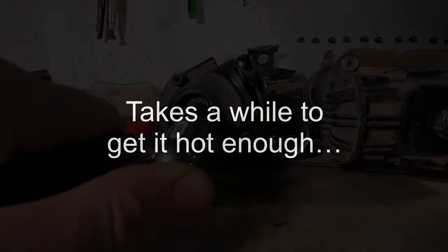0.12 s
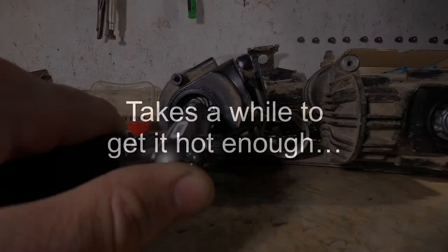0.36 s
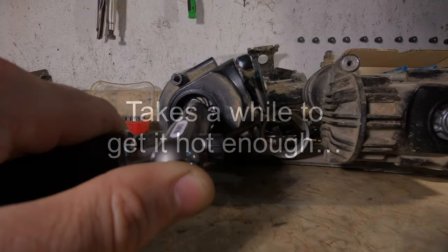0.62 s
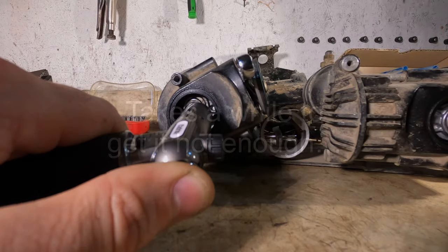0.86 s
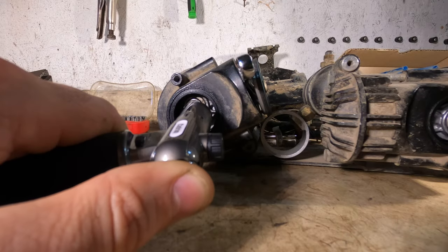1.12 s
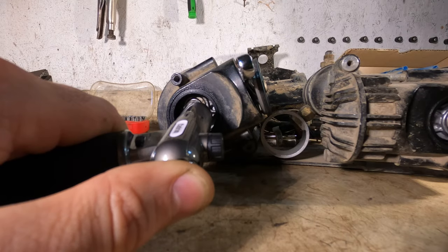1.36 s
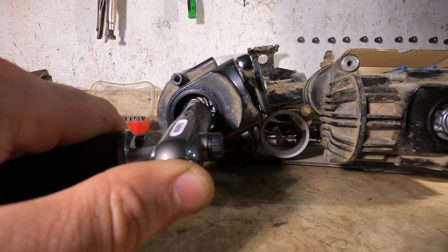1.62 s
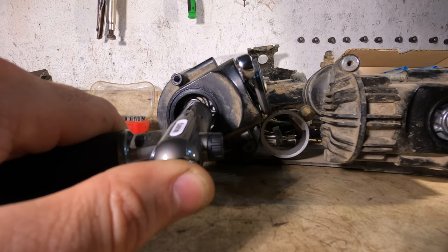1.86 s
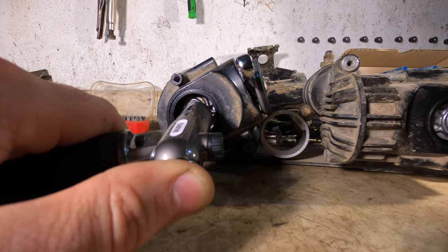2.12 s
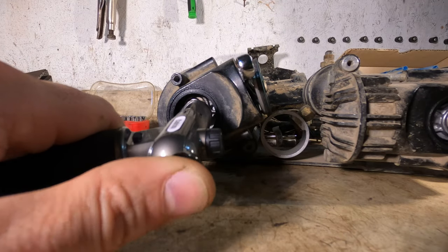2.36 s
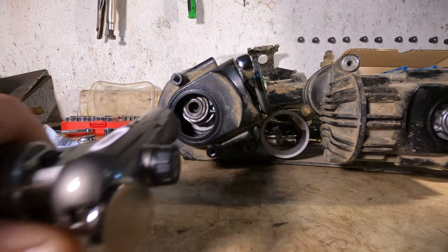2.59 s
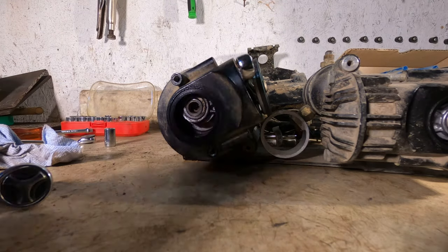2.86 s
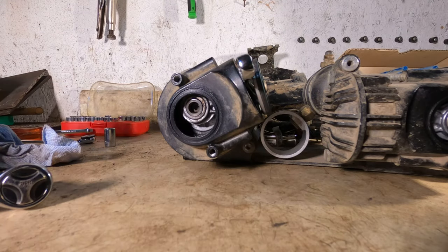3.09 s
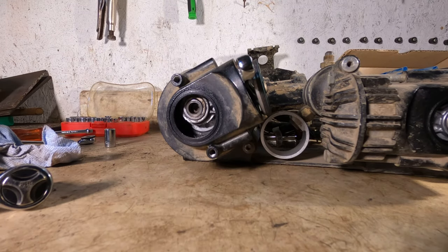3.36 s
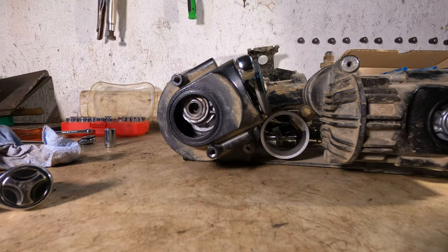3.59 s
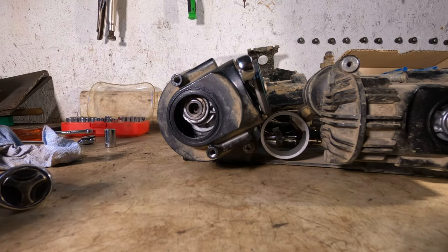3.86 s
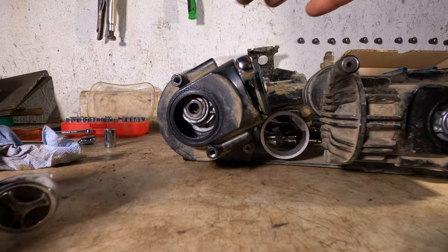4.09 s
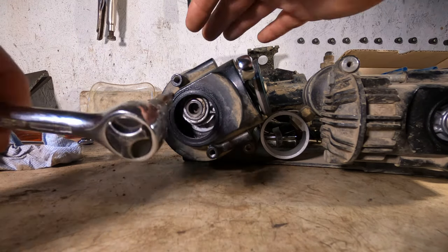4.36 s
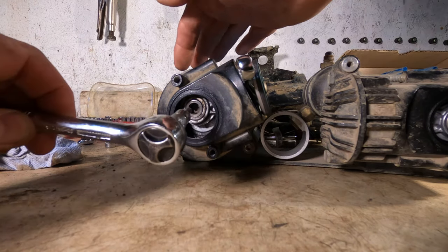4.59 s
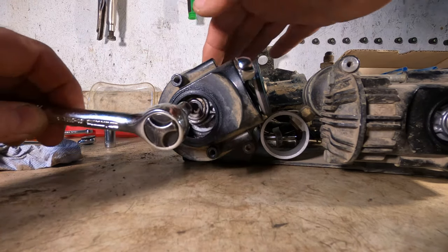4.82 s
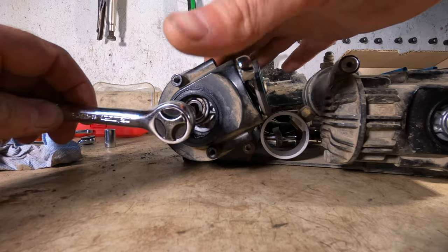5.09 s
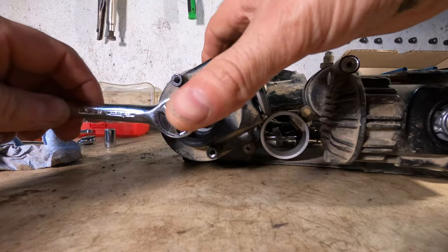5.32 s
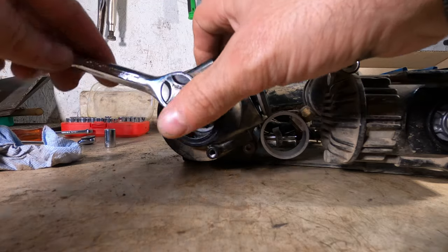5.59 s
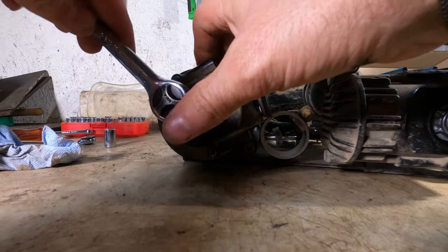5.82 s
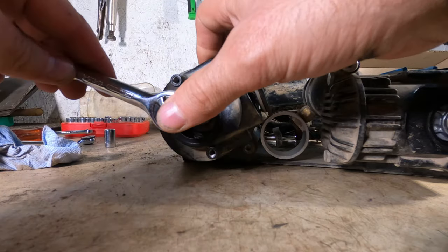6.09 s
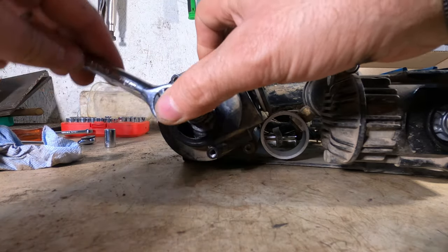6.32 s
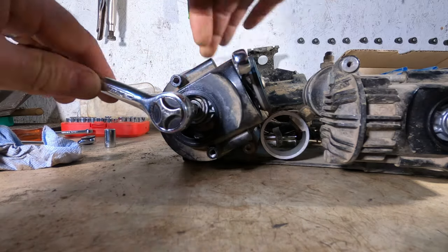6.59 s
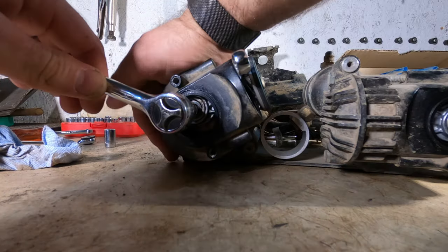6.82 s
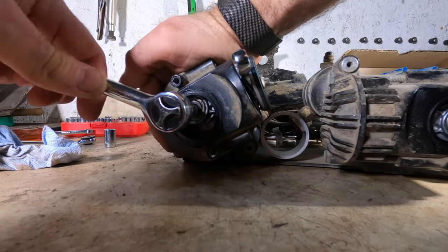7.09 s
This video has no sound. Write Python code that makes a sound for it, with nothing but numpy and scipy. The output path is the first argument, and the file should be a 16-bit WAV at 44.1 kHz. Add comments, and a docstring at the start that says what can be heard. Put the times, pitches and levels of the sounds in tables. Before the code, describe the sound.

Close stereo pickup in a small quiet workshop. From 0 to 2 s a small gas torch roars loudly and evenly inside a metal bore, a hollow midrange rush with a thin hiss of gas on top. At 2.0 s it is drawn out and breaks into fast irregular sputters, barking and spitting with low buffeting, until a loud sharp click shuts it off near 2.57 s. Brief rasps on wood follow to 2.7 s, then near silence with soft hiss. At 3.35-3.5 s the torch lands on the bench in a hard, woody, metallic clatter, leftward, with a fading scrape. From 3.95 s a ratchet drags across the wood, with a bright steel clink at 4.17 s. Faint fitting ticks and dull casing taps come at 5.05-5.6 s, over a low mutter; firmer knocks at 6.1-6.45 s, and a clinking scrape and knocks around 6.9-7.0 s.

```python
"""A small gas torch roars in the bore of a metal casing, sputters as it is drawn out and clicks off.
Then it is dragged over the wooden bench and set down hard; a ratchet is slid up, fitted and knocked on.
Flame and rasps are shaped noise; blows are noise cracks that ring modes of casing, bench and steel.
A close pair of microphone ports hears them in a small quiet workshop, over soft hiss and a low mutter."""
import sys
import numpy as np
from scipy import signal
from scipy.fft import rfft, irfft
from scipy.io import wavfile
from scipy.ndimage import uniform_filter1d

SR = 44100
rng = np.random.default_rng(int(sys.argv[2]) if len(sys.argv) > 2 else 0)


def wav_out(sig):
    """Save sig, one row per channel (or a flat mono array), as 16-bit PCM at SR to the path in sys.argv[1]."""
    wavfile.write(sys.argv[1], SR, np.round(np.clip(np.atleast_2d(sig).T, -1, 1) * 32767).astype(np.int16))


def volts_from_db(level):
    """Convert decibel levels to linear amplitude ratios."""
    exponent = np.asarray(level, float) / 20
    return 10 ** exponent


N = 317520
T = np.arange(N) / SR  # seconds
# the torch starts to leave the bore, takes this long to clear it, is shut off
DRAWN_S, DRAW_S, SHUT_S = 1.99, 0.096, 2.56


def unit(x):
    """Scale to rms 1."""
    return x / np.sqrt(np.mean(x ** 2))


def track(rows):
    """Columns of a curve, one value a sample."""
    s, *columns = np.transpose(rows)
    return [np.interp(T, s, c) for c in columns]


def ramp(start_s, length_s):
    """Rises from 0 at the start to 1 after the length."""
    return np.clip((T - start_s) / max(length_s, .001), 0, 1)


def walk(rate):
    """Slow smooth chance about 0, spread near a half, with rate fresh values a second."""
    k = int(SR / rate)
    steps = np.repeat(rng.standard_normal(N // k + 1), k)
    return 0.69 * uniform_filter1d(uniform_filter1d(steps, k), k)[:N]


def grains(spread_db):
    """Noise whose samples now and then stand out."""
    boost_db = spread_db * np.minimum(rng.exponential(size=N), 5)
    return unit(rng.standard_normal(N) * volts_from_db(boost_db))


def band(x, lo_hz, hi_hz, order=2):
    """Band-pass."""
    return signal.sosfilt(signal.butter(order, [lo_hz, min(hi_hz, .45 * SR)], "band", fs=SR, output="sos"), x)


def colour(x, points, peaks=()):
    """Minimum-phase filter through (Hz, dB) points, with resonances (Hz, width Hz, dB) added in power."""
    hz = np.maximum(np.arange(1025) * SR / 2048, 1)
    point_hz, point_db = np.array(points).T
    gain = volts_from_db(np.interp(np.log(hz), np.log(point_hz), point_db))
    power = sum(volts_from_db(db) ** 2 / (1 + (2 * (hz - f) / width) ** 2) ** 2 for f, width, db in peaks)
    gain = np.sqrt(gain ** 2 + power)
    # folding the cepstrum makes the filter causal
    cepstrum = irfft(np.log(gain + 1e-7))
    cepstrum[1:1024] *= 2
    cepstrum[1025:] = 0
    response = irfft(np.exp(rfft(cepstrum)))
    return signal.fftconvolve(x, response)[:len(x)]


def add(out, x, s):
    """Mix x into out from time s."""
    i = int(s * SR)
    out[i:i + len(x)] += x[:N - i]


def ring(modes, scatter_db, rise_ms):
    """One blow on a body: each mode is a close pair, struck differently each time; peak 1."""
    t, modes = T[:SR // 2], 2 * modes
    chance = rng.standard_normal((len(modes), 2))
    x = 0
    for (hz, db, t60), (strength, detune) in zip(modes, chance):
        mode_hz = hz + 0.6 * np.sqrt(hz) * detune
        x = x + volts_from_db(db + scatter_db * strength) * np.sin(2 * np.pi * mode_hz * t) * 1000 ** (-t / t60)
    x = x * (1 - np.exp(-t * 1000 / rise_ms))
    # loose parts chatter, so the ring fades unevenly
    chatter = np.interp(t, np.arange(61) / 120, rng.standard_normal(61))
    x = x * volts_from_db(2.5 * chatter * np.minimum(t / .03, 1))
    return x / np.abs(x).max()


def flame(db, drift_db_per_s):
    """Gain of a part of the flame: steady in the bore, drifting once drawn out, dying fast when shut."""
    drift_db = drift_db_per_s * np.clip(T - DRAWN_S, 0, SHUT_S - DRAWN_S)
    dying_db = 905 * np.maximum(T - SHUT_S, 0)
    return volts_from_db(db + drift_db - dying_db)


def torch():
    """Turbulent burning rings the bore; as the flame leaves it, it relights in short sharp puffs."""
    # colour of the burning: pitch_hz, relative level_db
    roar_colour = [(30, -87), (130, -20.5), (170, -17), (420, -9.5), (800, -7), (2700, -8), (3200, -21.5),
                   (4400, -33), (9500, -46), (12500, -71.5)]
    # resonances of the bore: pitch_hz, width_hz, relative level_db
    bore = [(974, 150, -1), (1340, 250, 0), (2290, 450, -2), (3600, 260, -17.5), (4700, 300, -31)]
    # the flame lifts and relights: start_s, relative strength_db
    sputters = [(2.0101, -8.5), (2.017, -13), (2.033, -8.5), (2.075, -8.5), (2.13, -9), (2.148, -8.5),
                (2.183, -11.5), (2.222, -11), (2.239, -5.5), (2.283, -8.5), (2.314, -7), (2.364, -9.5),
                (2.38, -19), (2.395, -17), (2.402, -9.5), (2.429, -10.5), (2.442, -10.5), (2.464, -6.5),
                (2.469, -7.5), (2.48, -8.5), (2.491, -4.5), (2.498, -12.5), (2.51, -9), (2.522, -9),
                (2.534, -7)]

    eddies = rng.standard_normal(N) * volts_from_db(1.8 * walk(160) + .5 * walk(10.7))
    puffs, t = np.zeros(N), T[:900] / 0.0035
    shape = np.sqrt(t) * np.exp(-t ** 1.75 / 1.98)
    for s, db in sputters:
        puff = shape * rng.standard_normal(len(t))
        # even out the chance strength of the middle band
        evened = puff * np.linalg.norm(shape) / np.linalg.norm(band(puff, 430, 3800))
        add(puffs, volts_from_db(db) * evened, s - .001)

    burning = flame(-26, -1.5) * eddies
    ringing = colour(burning + volts_from_db(-14.0) * puffs, roar_colour, bore)
    ringing = ringing / np.std(colour(eddies, roar_colour, bore))
    # part of each puff escapes the bore: a bark, a spit, a fizz above it and a thump
    bark = volts_from_db(-2.0) * band(puffs, 2044, 2620, order=4)
    spit = volts_from_db(-22.5) * band(puffs, 3970, 4920)
    fizz = volts_from_db(-37.5) * band(puffs, 2900, 8300)
    thump = volts_from_db(-9.5) * band(puffs, 94, 223, order=1)
    return ringing + bark + spit + fizz + thump


def nozzle():
    """Thin hiss of the gas jet, unlike at the two ports and stronger on the right."""
    # resonances of the jet: pitch_hz, width_hz, relative level_db
    jet = [(8690, 490, -3.5), (12160, 1100, 1), (10330, 11000, -12)]
    floor = [(1, -90), (2, -90)]  # next to nothing outside the resonances
    pair = [unit(colour(rng.standard_normal(N), floor, jet)) for _ in range(2)]
    return flame(-55, 5) * volts_from_db(np.array([[-3], [3]])) * pair


def buffeting():
    """Hot draught of the drawn-out flame shaking the ports, only partly alike in both."""
    both, left, right = (unit(band(rng.standard_normal(N), 25, 193)) for _ in range(3))
    draught = ramp(DRAWN_S, DRAW_S) * (1 - ramp(SHUT_S, 0.23))
    return volts_from_db(-45.5 + 1.5 * walk(25)) * draught * (both + 0.1 * np.array([left, right]))


def knocks():
    """A crack of a few ms at the contact, then casing, bench and ratchet steel ring."""
    # light touches of metal on metal: start_s, click peak_db, click centre_hz
    ticks = [(2.5661, -3, 3786), (3.337, -30, 860), (3.395, -19, 2600), (3.42, -30, 2900),
             (3.504, -32, 2600), (4.036, -34, 2570), (4.1669, -12.5, 3800), (4.2749, -26.5, 4600),
             (5.0459, -31, 3370), (5.122, -34.5, 3080), (5.1555, -37, 2170), (5.243, -39, 1560),
             (5.5239, -41, 790), (6.088, -30.5, 1440), (6.139, -36, 3180), (6.8224, -33, 2920),
             (6.97, -31.5, 2600), (7.1906, -27.5, 3230)]
    # blows with weight behind them: start_s, click peak_db, click centre_hz, bench peak_db, casing peak_db
    blows = [(3.348, -21, 845, -45, -23), (3.3588, -6, 2165, -15, -5), (3.384, -16, 2840, -11, -24.5),
             (3.4069, -25, 3200, -16.5, -14.5), (3.471, -27, 3400, -27.5, -26),
             (3.479, -27, 3010, -19.5, -20.5), (5.129, -26, 2900, -60, -37.5),
             (5.2663, -27.5, 2200, -57, -33.5), (6.1296, -48, 960, -32, -27.5),
             (6.325, -19, 2960, -40, -26.5), (6.4528, -25, 1440, -23.5, -19), (6.891, -26, 2430, -26, -47),
             (6.941, -19, 1520, -25, -18), (6.9501, -18, 2540, -19, -30.5)]
    # soft pushes of the hand that only ring the casing: start_s, peak_db
    pushes = [(5.164, -34.5), (5.613, -45.5), (6.024, -38.5), (6.067, -37), (6.621, -44)]
    # the heavy casing rocks on its feet: start_s, peak_db
    rocks = [(3.429, -26.5), (5.271, -43.5), (6.133, -31), (6.334, -40), (6.456, -25.5), (6.622, -38.5),
             (7.024, -31)]
    # blows on the ratchet head: start_s, peak_db, share of the ring time that the grip leaves
    head_blows = [(4.1684, -11, 0.28), (6.951, -12, 0.18)]
    # modes of each body: nominal pitch_hz, relative level_db, t60_s (the grip shortens that of the steel)
    casing = [(225.7, 5.5, 0.072), (303.5, 4, 0.078), (415.4, 4.5, 0.093), (573, -2, 0.05),
              (755, -1.5, 0.06), (1060, -3.5, 0.048)]
    bench = [(123.7, -5.5, 0.21), (169.3, 0, 0.087), (202, -18, 0.38)]
    feet = [(58.2, -4.5, 0.27), (83.6, -5.5, 0.25)]
    steel = [(6480, 0, .022), (6390, -15, .1), (6550, -13, .17)]

    out = np.zeros(N)
    for s, click_db, hz, *bodies_db in sorted(ticks + blows):
        t = T[:4000] * np.sqrt(hz / 2500)  # softer, lower contacts last longer
        fade = np.exp(-t / .0017) + .025 * np.exp(-t / .016)
        burst = rng.standard_normal(len(t)) * fade * (1 - np.exp(-t / .0012))
        # harder contacts sit higher, spread wider and carry more treble
        body = band(burst, hz / (1 + hz / 1900), hz * 1.505, order=3)
        treble = (hz / 6000) ** 1.52 * band(burst, hz, 2.24 * hz, order=1)
        crack = body + treble
        add(out, volts_from_db(click_db) * crack / np.abs(crack).max(), s)
        casing_db = click_db - 20.5  # a tick rings the casing only faintly
        if bodies_db:
            bench_db, casing_db = bodies_db
            add(out, volts_from_db(bench_db) * ring(bench, 3.5, 4.8), s)
        add(out, volts_from_db(casing_db) * ring(casing, 1.44, 0.87), s)
    for s, db in pushes:
        add(out, volts_from_db(db) * ring(casing[:3], 1.9, 35.0), s)
    for s, db in rocks:
        add(out, volts_from_db(db) * ring(feet, 1.6, 5.5), s)
    for s, db, free in head_blows:
        gripped = [(hz, level_db, t60 * free) for hz, level_db, t60 in steel]
        add(out, volts_from_db(db) * ring(gripped, 0.76, 0.23), s)
    return out


def drags():
    """Dense uneven slips ring the tool: a rasp, its gritty top and the wood droning underneath."""
    # tools dragged and rocked on wood, a row a stroke:
    # start_s, end_s, rasp level_db at first, rasp level_db at last, grit over the rasp_db
    strokes = [(2.594, 2.635, -41.5, -35.5, -16), (2.642, 2.719, -36, -38.5, -1),
               (3.357, 3.43, -31.5, -35.5, -14.5), (3.477, 3.634, -45, -64, -8.5),
               (3.931, 3.954, -53, -58, -1.5), (3.965, 3.986, -47.5, -33, -10.5),
               (3.989, 4.043, -34.5, -62, -5.5), (4.053, 4.158, -40, -30.5, -8),
               (4.181, 4.278, -69, -68, 14), (6.343, 6.416, -58, -56, -5.5), (6.896, 6.912, -37, -47.5, -3),
               (6.941, 7.04, -39.5, -62, -16)]
    # what a dragged tool rings with: pitch_hz, width_hz, relative level_db
    tool = [(1198, 850, 2), (2270, 150, -0.5), (3100, 900, -4.5)]
    bite_db_per_s, lift_db_per_s = 3500, 1204  # how fast a stroke bites and lets go

    slips = grains(3) * volts_from_db(3.2 * walk(200))
    rung = colour(slips, [(300, -28.5), (2000, -7)], tool)
    rasp_power, grit_power = 0, 0
    for start, end, first_db, last_db, grit_db in strokes:
        db = first_db + (last_db - first_db) * ramp(start, end - start)
        db = db - bite_db_per_s * np.maximum(start - T, 0) - lift_db_per_s * np.maximum(T - end, 0)
        rasp_power = rasp_power + volts_from_db(2 * db)
        grit_power = grit_power + volts_from_db(2 * (db + grit_db))
    rasp = unit(band(rung, 600, 4000))
    wood = volts_from_db(2.5) * unit(band(rng.standard_normal(N), 175, 515))
    top = grains(3.5) * volts_from_db(3.5 * walk(150))
    grit = unit(band(top, 3000, 6180))
    fizz = volts_from_db(-29.0) * unit(band(slips, 5400, 13000))
    return np.sqrt(rasp_power) * (rasp + wood) + np.sqrt(grit_power) * (grit + fizz)


def ports(x):
    """Left port lags a sample; clutter scatters the treble, walls add a short tail, the bench rocks the housing."""
    # where the hands work: start_s, left minus right_db
    place = [(2.5, 3), (3.3, 11), (4.2, 9.5), (5, 4)]
    t = T[:SR // 3]
    pan_db = track(place)[0]
    rocking = band(rng.standard_normal(len(t)), 25, 323) * np.exp(-t / 0.0072)
    rocking = volts_from_db(-10.5) * rocking / np.abs(rfft(rocking)).max()
    out = []
    for lag, sign in ((1, 1), (0, -1)):  # left, right; rocking reaches them in opposite sense
        direct = np.arange(len(t)) == lag
        clutter = band(rng.standard_normal(len(t)), 9700, 19000) * np.exp(-t / 0.0011)
        clutter = volts_from_db(-10.0) * clutter / np.linalg.norm(clutter)
        walls = band(rng.standard_normal(len(t)), 40, 7400) * 1000 ** (-t / 0.44) * (t > .006)
        walls = volts_from_db(-21.5) * walls / np.linalg.norm(walls)
        heard = signal.fftconvolve(x, direct + clutter + walls + sign * rocking)[:N]
        # the housing shades only the shorter waves
        shade = (volts_from_db(sign * pan_db / 2) - 1) * band(heard, 1200, 10000, order=1)
        out.append(heard + shade)
    return np.array(out) * volts_from_db([[-2], [0]])  # left port a little weaker


def shop():
    """Soft hiss of air, partly alike at both ports and most alike in the bass; thin bands waver, come and go;
    the bench mutters."""
    # colour of the air: pitch_hz, relative level_db
    air_colour = [(30, -6), (61, -13.5), (122, -24), (190, -10), (330, -8.5), (850, -18.5), (1370, -10),
                  (5300, -12.5), (6200, -18), (10000, -29), (15000, -49)]
    # gain of the hiss and its thin bands: start_s, gain_db
    air_gain = [(2.76, -61.5), (3.15, -56.5), (3.7, -62.5), (4.3, -56.5), (4.9, -61.5), (5.35, -56),
                (5.95, -56), (6.25, -60.5), (6.6, -55.5), (6.8, -61), (7.05, -57.5)]
    air_db = track(air_gain)[0]
    mid, left, right = (unit(colour(rng.standard_normal(N), air_colour)) for _ in range(3))
    apart = 0.95 * np.array([volts_from_db(1.0) * left, volts_from_db(-2.0) * right])
    hiss = .5 * mid + apart + 1.1 * band(mid, 9.3, 130, order=1)
    thin = 0
    for hz in (4500, 5100):
        noise = unit(band(rng.standard_normal((2, N)), 10, 160)) * volts_from_db(-7 + 6 * walk(4))
        wavering = np.sin(2 * np.pi * np.cumsum(hz * (1 + .05 * walk(3))) / SR)
        thin = thin + noise * wavering

    # the bench mutters louder once the casing is gripped at 5.1 s
    hands_off_db, hands_on_db = -75.5, -60.5
    hands_db = hands_off_db + (hands_on_db - hands_off_db) * ramp(5.1, 0.047)
    low = unit(band(rng.standard_normal(N), 38, 65))
    mutter = low + 0.73 * unit(band(rng.standard_normal(N), 217, 490))
    swells = volts_from_db(4.5 * walk(30))
    return volts_from_db(air_db) * (hiss + thin) + volts_from_db(hands_db) * unit(swells * mutter)


def scene():
    """Flame, blows and drags through the ports, with jet hiss, buffeting and workshop air at the ports."""
    return ports(torch() + knocks() + drags()) + nozzle() + buffeting() + shop()


def top_cut(x):
    """Nothing passes above the cut-off."""
    return signal.sosfilt(signal.butter(12, 16450, fs=SR, output="sos"), x)


def record(dry):
    """Peaks clip at full scale."""
    clipped = np.clip(dry, -1, 1)
    return top_cut(clipped)


dry = scene()
out = record(dry)
wav_out(out)
```